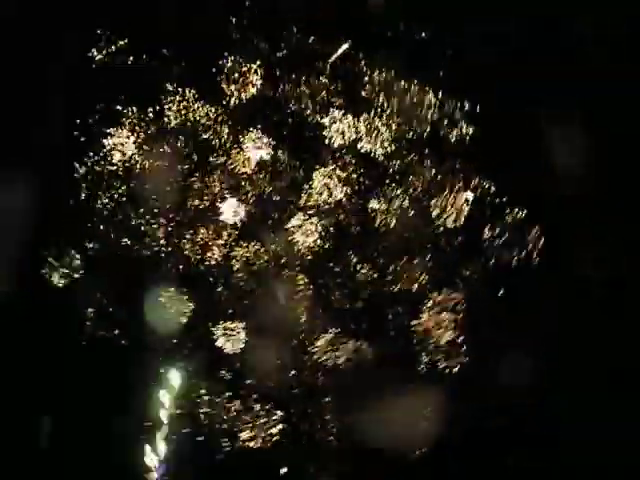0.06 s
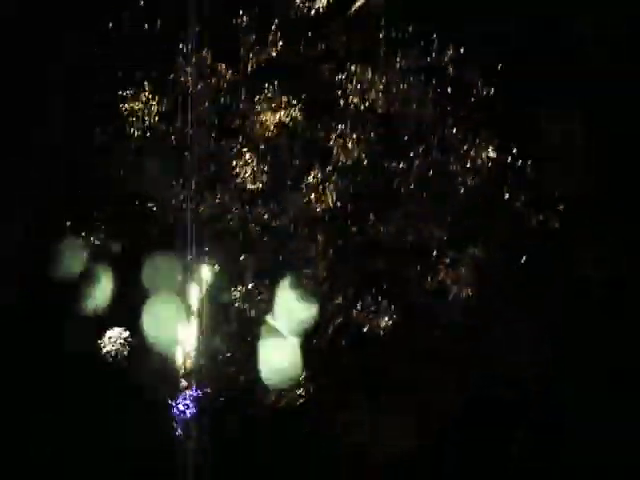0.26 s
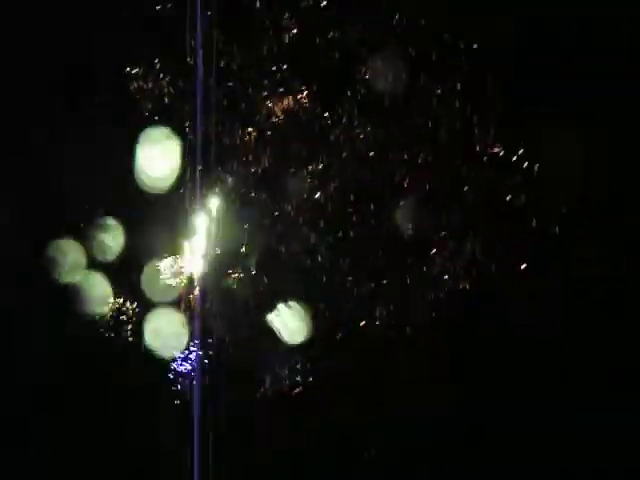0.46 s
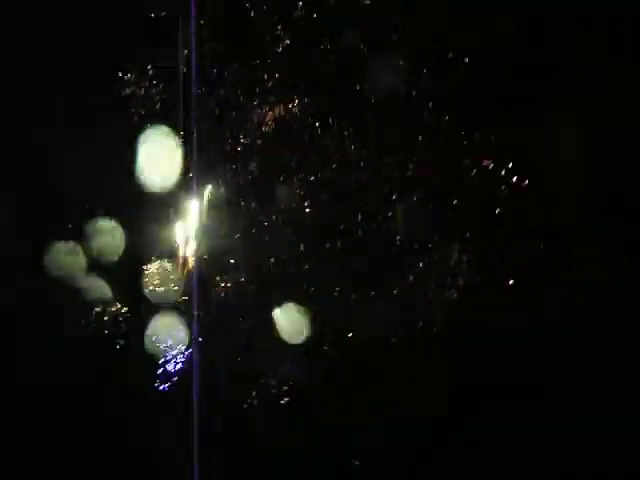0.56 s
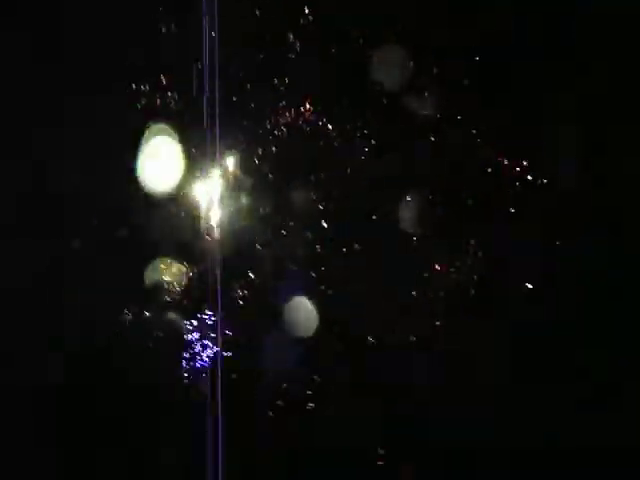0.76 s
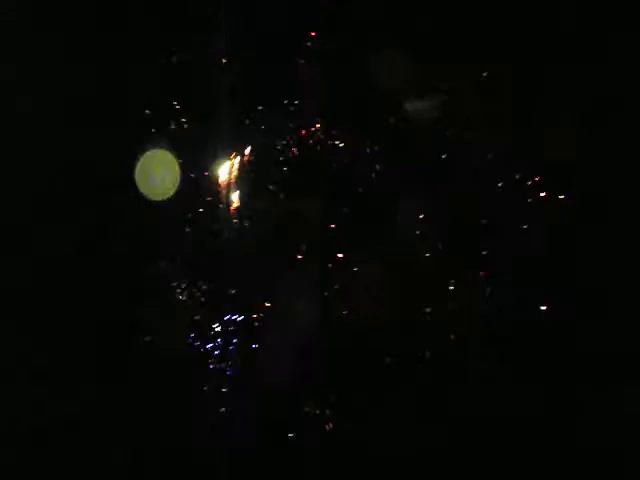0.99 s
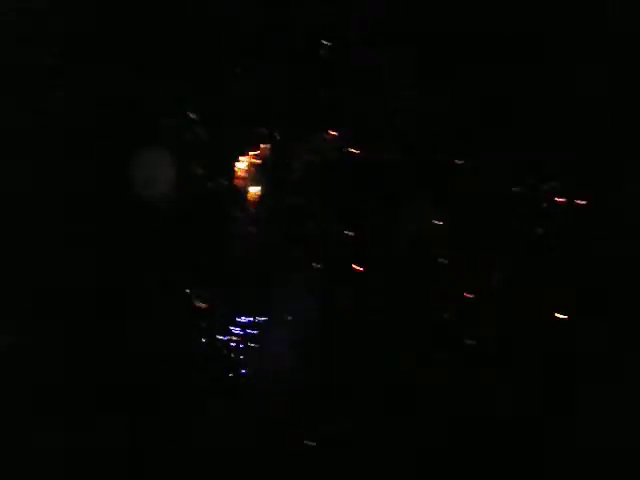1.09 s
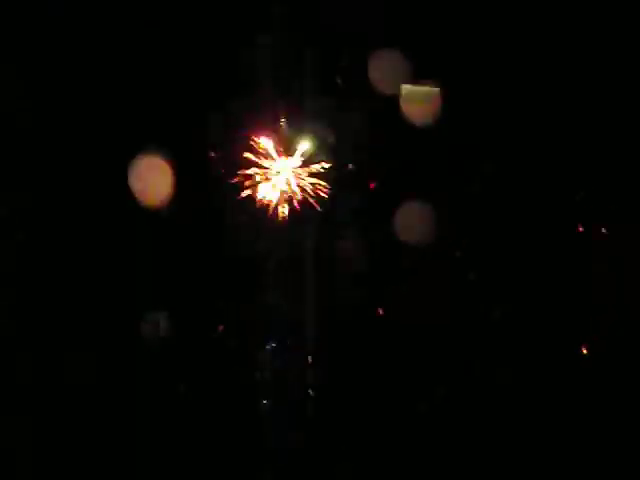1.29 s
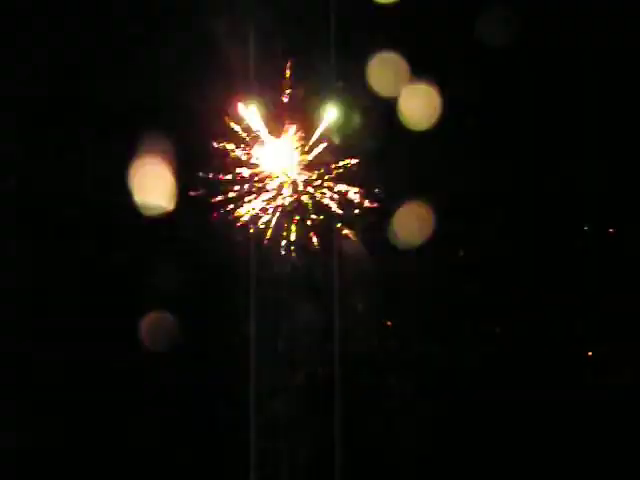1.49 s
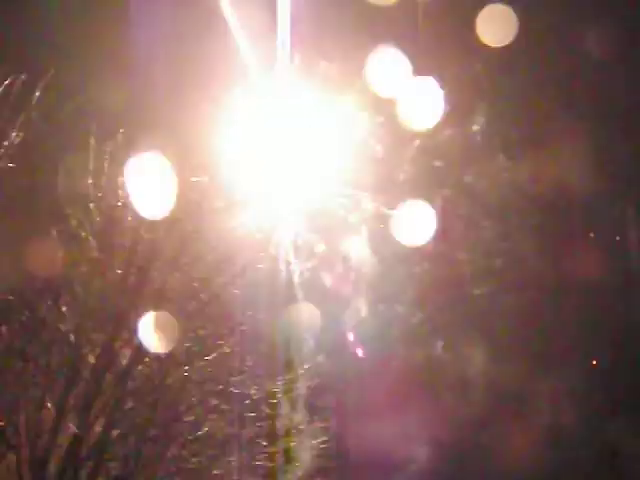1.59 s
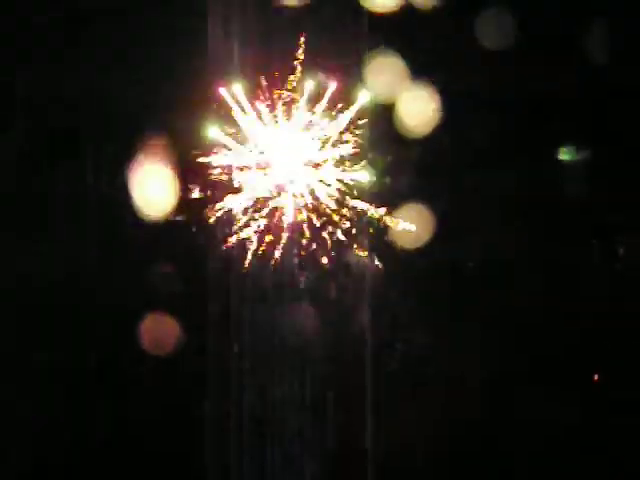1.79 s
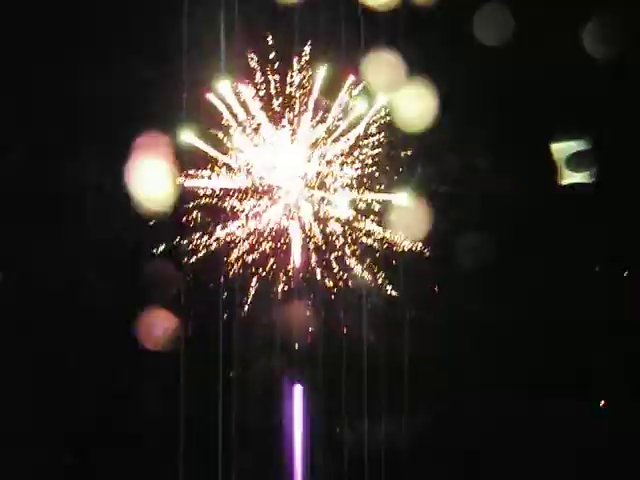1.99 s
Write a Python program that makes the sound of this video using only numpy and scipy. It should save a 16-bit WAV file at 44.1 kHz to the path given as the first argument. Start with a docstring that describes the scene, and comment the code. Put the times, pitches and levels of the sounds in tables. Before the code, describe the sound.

Fireworks crackle densely from the start, with a few louder snaps, dull distant thuds and a low rumble underneath. At about 1.3 seconds a shell bursts close by with a sharp, loud bang that overloads the small microphone. Two more bangs follow at about 1.6 and 1.8 seconds, each weaker. Short echoes roll away over open ground while the crackle continues more faintly until about 2 seconds.

```python
"""Three firework shells burst close by, over open ground, heard through a small camera microphone.
Their shock fronts and first echoes ring it near 3 kHz and overload it; then the sound rolls away.
Before them a cloud of crackling stars pops densely, fading under the bangs.
Farther off, other shells thud dully, and the most distant merge into a rumble."""
import sys
import numpy as np
from scipy import signal
from scipy.fft import rfft, irfft
from scipy.io import wavfile
from scipy.ndimage import uniform_filter1d

SR = 44100
rng = np.random.default_rng(int(sys.argv[2]) if len(sys.argv) > 2 else 0)


def transcribe(u):
    """Save the signal u as a 16-bit wav file named by the first command-line argument.

    u: samples, shape (n,) or (channels, n), limited to [-1, 1]; the rate is SR.
    q: integer samples, one column per channel.
    """
    v = np.clip(np.atleast_2d(u).T, -1, 1)
    q = np.round(v * 32767).astype(np.int16)
    wavfile.write(sys.argv[1], SR, q)


N = 90404
TIME = np.arange(N) / SR
SHORT, LONG = TIME[:SR // 20], TIME[:SR // 2]   # time axes for single events

# bursts of the close shells: t/s, front/dB, push/dB, push decay/s, echo tail/dB
BURSTS = [(1.3243, 18, 11.5, .011, -18.5), (1.6108, 11.5, 5.5, .011, -20.5), (1.7745, 10.5, 1, 0.0099, -40)]


def close_shells():
    """Each burst arrives direct, then reflected; every front rings the microphone."""
    # reflections off the ground and nearby walls: t/s, front/dB, push/dB, front decay/s
    reflections = [(1.3327, 14, 1.5, 0.00059), (1.3351, 15, -4, 0.00084), (1.3367, 0.5, -9, 0.00039),
                   (1.3508, -8, -38, 0.00069), (1.3520, -1, -18, 0.00091), (1.3581, 0, -24, 0.00046),
                   (1.6142, 12.5, -5, 0.00032), (1.6194, 13, -4, 0.00052), (1.6219, 4.5, -20, 0.00096),
                   (1.623, 10, -3, .0005), (1.6258, 0.5, -25, 0.0012), (1.7831, 7, -8, 0.00044),
                   (1.7858, 4.5, -16, 0.00029), (1.7946, -5, -16, 0.00032)]
    swing_share, swing_s = .2, 0.063
    mic_hz, mic_width_hz, ring_db = 2960, 920, 7
    bangs = np.zeros(N)
    # the overloaded microphone's slow, deep swing after each bang
    mic_swing = swing_share * np.exp(-LONG / swing_s) * np.sin(LONG / swing_s)
    for s, front_db, push_db, push_s, _ in BURSTS:
        direct = shock(LONG, front_db, push_db, front_s=0.00025, push_s=push_s)
        add(bangs, s, direct - from_db(push_db) * mic_swing)
    for s, front_db, push_db, front_s in reflections:
        add(bangs, s, shock(SHORT, front_db, push_db, front_s, push_s=0.0031))
    ring = signal.lfilter(*signal.iirpeak(mic_hz, mic_hz / mic_width_hz, fs=SR), bangs + 1e-18)
    return bangs + from_db(ring_db) * ring


def shock(t, front_db, push_db, front_s, push_s, rise_s=0.0003):
    """A sharp front kicks the diaphragm; a longer push of air follows."""
    front = from_db(front_db) * np.exp(-t / front_s)
    push = from_db(push_db) * (1 - np.exp(-t / rise_s)) * np.exp(-t / push_s)
    return push - front


def volleys():
    """Small charges thrown by a shell go off so close together that they merge into one short rip."""
    # volleys of charges: t/s, length/s, level/dB, fall/dB
    rips = [(1.336, .024, -2, 7.5), (1.621, 0.0075, -13, 7.5)]
    # spectrum of a volley: f/Hz, level/dB
    spectrum = [(100, -2.5), (300, -3), (1000, -11), (2000, -9.5), (3000, 0), (3800, -10), (5200, -14.5)]
    envelope = np.zeros(N)
    for s, length, db, fall_db in rips:
        add(envelope, s, from_db(db - fall_db * SHORT[SHORT < length] / length))
    return colour(envelope * clicks(per_s=6000, spread_db=-3.0), spectrum)


def crackle():
    """Hundreds of stars pop each second, in clumps, over the wash of their own echoes; a few stand out."""
    # loudness of the cloud of stars: t/s, level/dB
    cloud = [(0, -28.5), (.18, -32.5), (.22, -25), (.3, -28.5), (.39, -22), (.44, -33), (.49, -29),
             (.56, -33), (.64, -22.5), (.83, -25.5), (.91, -21.5), (1.05, -27.5), (1.14, -24.5),
             (1.29, -37), (1.48, -33.5), (1.58, -26), (1.7, -32), (1.82, -33.5), (1.94, -38.5),
             (2.05, -33.5)]
    # spectrum of a pop: f/Hz, level/dB
    spectrum = [(60, -20), (200, -10), (400, -10), (800, -12.5), (1300, -11.5), (2000, -10.5), (2600, -5.5),
                (3050, 1.5), (3600, -8), (4300, -12.5), (5200, -22)]
    pops_db, wash_db, clump_db = -1.5, -4, 1.35
    clumps = from_db(clump_db * rms_one(uniform_filter1d(rng.standard_normal(N), size=600)))
    pops = from_db(pops_db) * clicks(per_s=700, spread_db=2.5)
    wash = from_db(wash_db) * rng.standard_normal(N)
    return colour((pops + wash) * clumps * level(cloud) + snaps(), spectrum)


def snaps():
    """Each loud star is a click followed by a millisecond or two of scatter."""
    # single loud stars: t/s, level/dB
    stars = [(0.0181, -11.5), (.037, -7), (0.045, -12), (.146, -18), (.2008, -6.5), (.2515, -9),
             (0.2574, -10), (0.2829, -11), (0.3358, -2.5), (0.3855, -11), (0.4098, 0.5), (0.4127, -7),
             (0.4781, -12.5), (0.484, -15), (0.4868, 3.5), (.502, -12.5), (.672, -9.5), (.686, -4),
             (.707, -9), (.809, -12), (0.9324, -5), (.977, -6.5), (1.013, -3), (1.12, 0.5), (1.1219, -9),
             (1.127, -7), (1.13, -2.5), (1.1855, -6.5), (1.215, -7.5), (1.254, -12.5), (1.5345, -10),
             (1.647, -14)]
    gain_db, scatter_db, scatter_s = 3.5, 1.5, 0.0018
    click = SHORT == 0
    out = np.zeros(N)
    for s, db in stars:
        scatter = rng.standard_normal(len(SHORT)) * np.exp(-SHORT / scatter_s)
        scatter *= from_db(scatter_db) / np.linalg.norm(scatter)
        add(out, s, from_db(db) * (scatter - click))
    return from_db(gain_db) * out


def pings():
    """Some stars ring for a few cycles, like a short ping or a hollow knock."""
    # ringing stars: t/s, f/Hz, level/dB, length/s
    stars = [(0.2574, 1490, -17, 0.0036), (1.125, 4040, -13, .002), (1.2243, 2810, -4, 0.0019)]
    out = np.zeros(N)
    for s, hz, db, length in stars:
        envelope = np.sin(np.pi * np.minimum(SHORT / length, 1))
        add(out, s, from_db(db) * envelope * np.sin(2 * np.pi * hz * SHORT))
    return out


def far_shells(top_hz=807, boom_hz=103):
    """Blast waves dulled by distance: a push, then a dip in pressure, with a low boom."""
    # farther shells: t/s, level/dB, push length/s
    shells = [(.134, -14, 0.0054), (.166, -20.5, .006), (0.2006, -12, .003), (.218, -16, 0.0058),
              (0.2574, -8.5, .0015), (.331, -11.5, 0.0055), (.352, -16, 0.0044), (.366, -15, .005),
              (.393, -13.5, 0.0014), (0.409, -9, 0.0022), (.4138, -4.5, 0.0046), (.515, -17.5, 0.0042),
              (.6715, -13, 0.0013), (.7066, -1.5, 0.0015), (.902, -12, 0.0022), (.922, -10, 0.0028),
              (.97, -12, 0.0043), (1.0128, -7.5, 0.0018), (1.077, -13.5, .004), (1.091, -12, .003),
              (1.195, -13.5, .004), (1.215, -14, 0.00095), (1.5344, -14, .0006), (1.647, -10, .001),
              (1.872, -27.5, 0.0036)]
    blasts = np.zeros(N)
    for s, db, push_s in shells:
        add(blasts, s, from_db(db) * np.exp(-SHORT / push_s) * (1 - SHORT / push_s))
    thuds = signal.sosfilt(signal.butter(2, top_hz, fs=SR, output="sos"), blasts + 1e-18)
    boom = signal.lfilter(*signal.iirpeak(boom_hz, 1, fs=SR), thuds)
    return thuds + boom


def distant_rumble():
    """Countless weak blasts from distant shells merge into a rumble."""
    # loudness of the rumble: t/s, level/dB
    swell = [(0, -34.5), (.12, -29.5), (.22, -28), (.29, -29.5), (.39, -18.5), (.44, -32.5), (.58, -29.5),
             (.68, -26), (.8, -29.5), (.93, -22.5), (1.03, -26), (1.2, -25.5), (1.28, -33), (1.4, -37.5),
             (1.7, -41), (1.85, -49), (2.05, -54)]
    # spectrum of the rumble: f/Hz, level/dB
    spectrum = [(15, -4), (35, -0.5), (90, 0.5), (160, -3.5), (260, -12.5), (500, -21.5), (1200, -37),
                (3000, -60)]
    blasts = clicks(per_s=250, spread_db=1.85)
    return level(swell) * rms_one(colour(blasts, spectrum))


def surroundings(delay_s=0.016, t60_s=0.54):
    """Each close bang dies away over the ground in diffuse echoes, above a low continuous roll."""
    # spectrum of the echo tails: f/Hz, level/dB
    tail_spectrum = [(60, -5), (200, -14), (330, 1.5), (520, -3), (800, -10.5), (1300, -1.5), (2000, -3.5),
                     (3000, 7.5), (3700, -2.5), (5200, -23.5)]
    # low roll of echoes from all around: t/s, level/dB
    roll_swell = [(0, -45.5), (.6, -43), (.95, -33), (1.25, -34.5), (1.5, -36), (1.75, -33.5),
                  (1.92, -42.5), (2.05, -38.5)]
    # spectrum of the roll: f/Hz, level/dB
    roll_spectrum = [(100, -16.5), (250, -1), (350, -0.5), (520, -1.5), (800, -16), (1100, -9),
                     (2500, -22.5)]
    envelope = np.zeros(N)
    for s, *_, tail_db in BURSTS:
        add(envelope, s + delay_s, from_db(tail_db - 60 * LONG / t60_s))
    tails = colour(envelope * rng.standard_normal(N), tail_spectrum)
    roll = level(roll_swell) * colour(rng.standard_normal(N), roll_spectrum)
    return tails + roll


def clicks(per_s, spread_db):
    """Random clicks of uneven size and either sign; rms 1."""
    sizes = from_db(spread_db * np.minimum(rng.exponential(1, N), 3.5))
    signs = rng.choice([-1, 1], N)
    return rms_one(sizes * signs * (rng.random(N) < per_s / SR))


def colour(x, points, size=8192):
    """Causal filter of unit energy shaped by (f/Hz, level/dB) points, rolled off above the last."""
    hz, db = np.transpose(points)
    bin_hz = np.arange(size // 2 + 1) * SR / size
    gain = from_db(np.interp(np.log(bin_hz + 1), np.log(hz), db))
    gain /= np.sqrt(1 + (bin_hz / (2 * hz[-1])) ** 4)
    # minimum phase keeps the attacks sharp
    cepstrum = irfft(np.log(gain))
    cepstrum[1:size // 2] *= 2
    cepstrum[size // 2 + 1:] = 0
    response = irfft(np.exp(rfft(cepstrum)))
    return signal.fftconvolve(x, response / np.linalg.norm(response))[:N]


def from_db(db):
    """Decibels to gain."""
    return 10 ** (np.asarray(db) / 20)


def rms_one(x):
    """Scale to rms 1."""
    return x / np.sqrt(np.mean(x ** 2) + 1e-20)


def level(rows):
    """A (t/s, level/dB) curve as a gain per sample."""
    return from_db(np.interp(TIME, *np.transpose(rows)))


def add(out, s, sound):
    """Mix a sound in at time s."""
    part = out[int(s * SR):][:len(sound)]
    part += sound[:len(part)]


def scene():
    """The whole display, near and far, at one microphone."""
    stars = crackle() + snaps() + pings()
    shells = far_shells() + distant_rumble() + close_shells() + volleys()
    return (stars + shells + surroundings())[None]


def record(dry):
    """The camera's input clips on the bangs and feeds a narrow channel; the overshoot clips again."""
    channel_hz, cutoff_hz = 5480, 17200
    clip_level, peak_level = .7, .72
    dulled = signal.sosfilt(signal.butter(6, channel_hz, fs=SR, output="sos"), dry[0])
    clipped = np.clip(dulled, -clip_level, clip_level)
    channel = signal.firwin(121, channel_hz, window=("kaiser", 8), fs=SR)
    narrow = signal.oaconvolve(clipped, channel, "same")
    top_cut = signal.cheby2(12, 70, cutoff_hz, fs=SR, output="sos")
    return signal.sosfilt(top_cut, np.clip(narrow, -peak_level, peak_level))[None]


dry = scene()
out = record(dry)
transcribe(out)
```